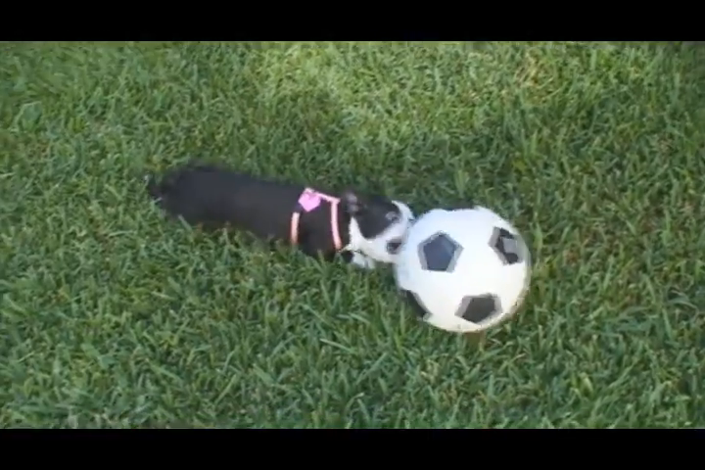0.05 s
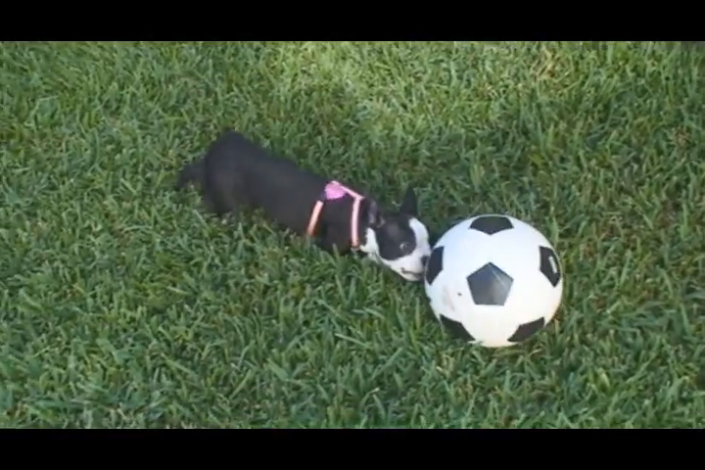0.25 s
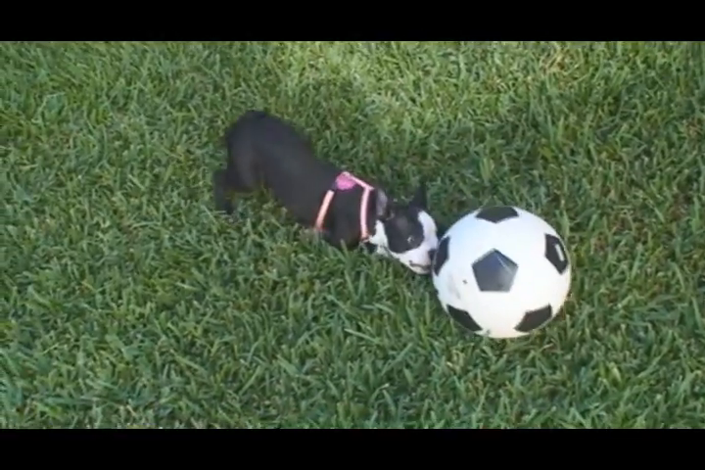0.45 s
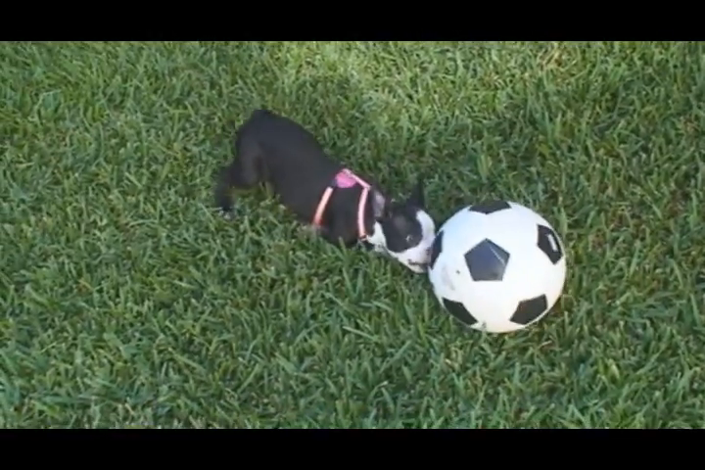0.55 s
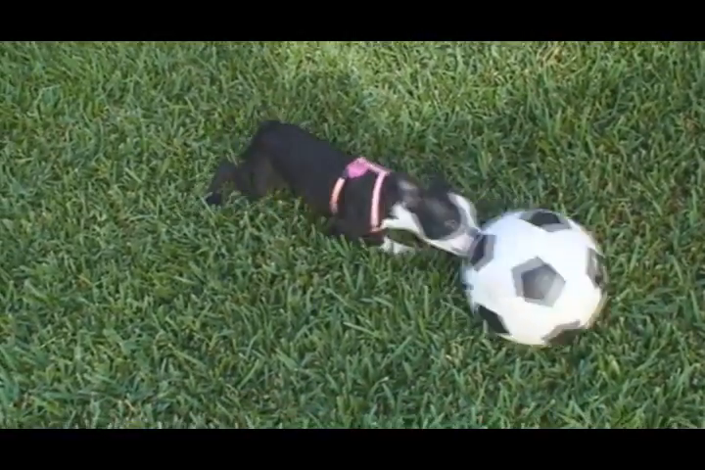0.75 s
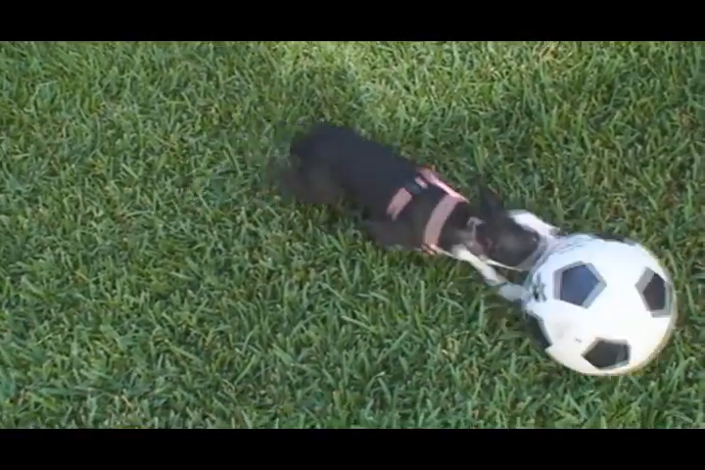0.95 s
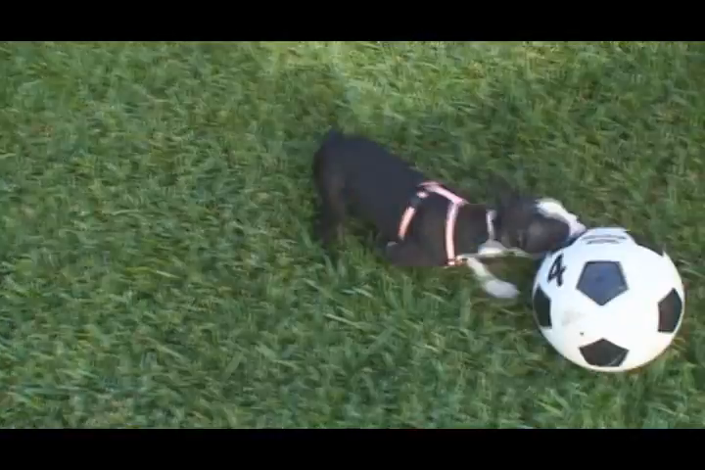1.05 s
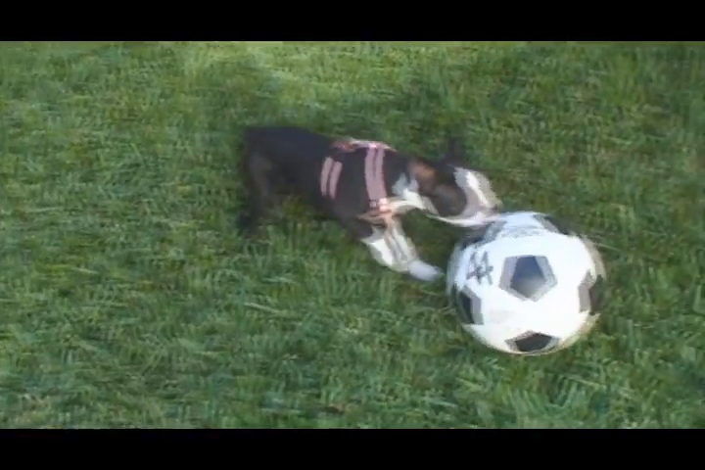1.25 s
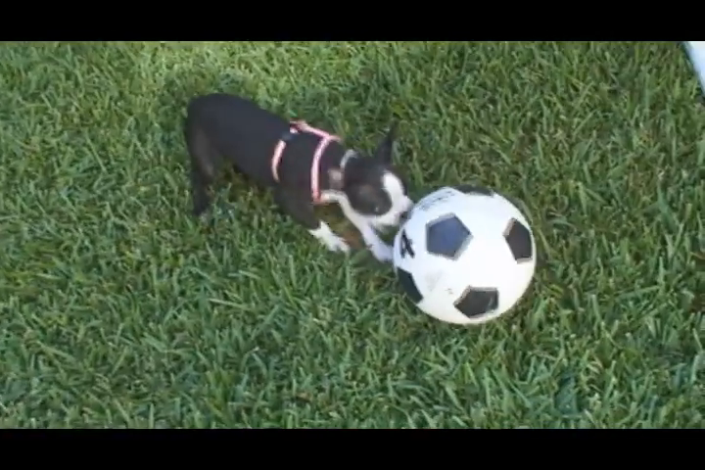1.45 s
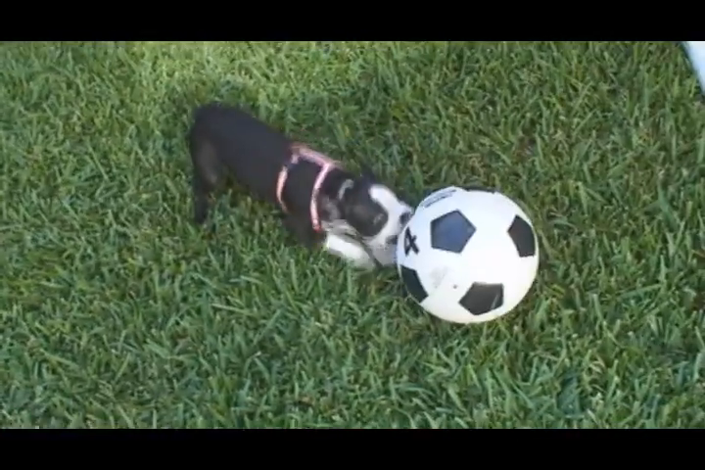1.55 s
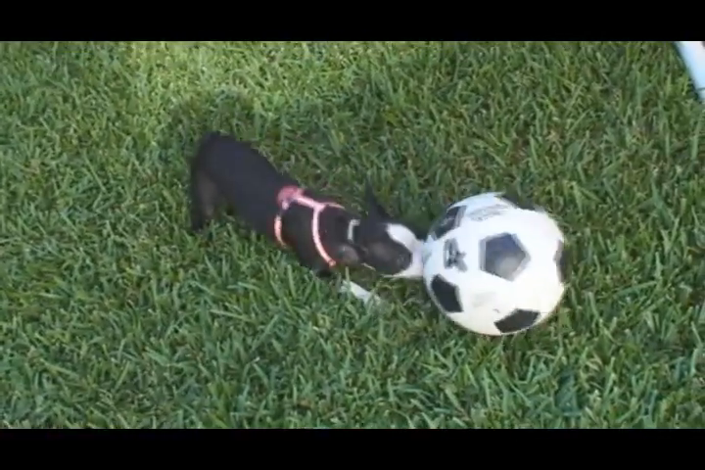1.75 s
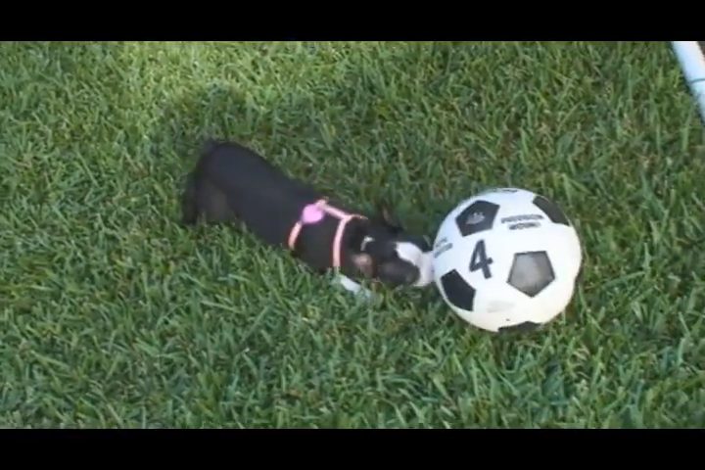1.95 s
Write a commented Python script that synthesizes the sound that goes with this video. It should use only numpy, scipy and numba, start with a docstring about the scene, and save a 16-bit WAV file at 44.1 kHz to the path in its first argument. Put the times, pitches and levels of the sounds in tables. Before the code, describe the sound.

Puppy yapping twice and whining briefly outdoors, with tag clinks, grass rustle and faint traffic

```python
"""A puppy on a lawn, close by, yaps at a ball, yaps again, whines once and at the end starts to grumble:
pulses and noise through a moving mouth resonance and a fixed throat. Its metal tag, decaying sines, clinks
after the first yap, in the whine and later; a far bird, gliding tones, chirps before the second yap and near the end.
Late ticks under paws and ball are short decaying tones. Throughout, grass rustles (grainy noise), traffic
rumbles (patchy noise) and a low hum wavers; house walls and fences answer with decaying noise tails."""
import sys
import numpy as np
from scipy import signal
from scipy.fft import rfft, irfft, next_fast_len
from scipy.io import wavfile
from scipy.ndimage import uniform_filter1d, map_coordinates
from numba import njit

SR = 44100
rng = np.random.default_rng(int(sys.argv[2]) if len(sys.argv) > 2 else 0)


def rack_gain(trim_db):
    """Turn a fader trim in dB into the linear factor to multiply a signal by."""
    fader = np.asarray(trim_db, float)
    return 10 ** (fader / 20)


def store_wav(level_fs):
    """Save 16-bit WAV to argv[1]."""
    pcm = np.round(np.clip(np.atleast_2d(level_fs), -1, 1) * 32767)
    wavfile.write(sys.argv[1], SR, pcm.T.astype(np.int16))


N = 88200  # length [samples]
SHORT_T = np.arange(SR // 4) / SR  # clock of one small sound [s]


def unit(x):
    """Scaled to rms 1."""
    return x / np.sqrt(np.mean(x ** 2) + 1e-20)


def along(points, hz):
    """(frequency [Hz], value) points read on a log frequency axis."""
    f, v = np.transpose(points)
    return np.interp(np.log(hz + 1), np.log(f + 1), v)


def curves(rows):
    """One value per sample for each column after the time."""
    s, *cols = np.transpose(rows)
    return [np.interp(np.arange(N) / SR, s, c) for c in cols]


def wobble(rate):
    """A smooth random curve, rate knots a second."""
    knots = rng.standard_normal(int(N * rate / SR) + 4)
    return map_coordinates(knots, [np.arange(N) * rate / SR])


def short_wobble(rate):
    """A random curve as long as one small sound."""
    return wobble(rate)[:len(SHORT_T)]


def filtered(x, response):
    """x times a response of frequency."""
    m = next_fast_len(N + SR // 2)
    return irfft(rfft(x, m) * response(np.fft.rfftfreq(m, 1 / SR)), m)[..., :N]


def shaped(x, spectrum):
    """x coloured by a (frequency [Hz], level [dB]) table."""
    return filtered(x, lambda hz: rack_gain(along(spectrum, hz)))


def placed_in_time(sounds):
    """Adds up (time [s], small sound) pairs."""
    out = np.zeros(N + SR)
    for s, sound in sounds:
        out[round(s * SR):][:len(sound)] += sound
    return out[:N]


@njit
def resonate(x, pull, keep):
    """A two-pole resonance whose centre and width move."""
    y = np.zeros(len(x))
    for i in range(2, len(x)):
        y[i] = (1 - keep[i]) * (x[i] - x[i - 2]) + pull[i] * y[i - 1] - keep[i] * y[i - 2]
    return y


# Calls of the pup, two yaps, a whine and a grumble:
# (time [s], pitch [Hz], mouth resonance [Hz], mouth drive level [dB], upper throat band level [dB])
PUP_CALLS = [
    [(.197, 481.4, 1620, -34, -48), (.207, 583.4, 1560, -14, -22), (.218, 693.7, 1590, -23, -14.5),
     (.234, 838.6, 1390, -56, -18), (.24, 715, 1310, -13, -17.5), (.268, 642, 1150, -18.5, -22),
     (.298, 520, 926, -18.5, -29), (.315, 521, 805, -36, -33.5), (.332, 604, 682, -42.5, -45),
     (.348, 498, 534, -39, -58), (.372, 397, 420, -69, -69)],
    [(.809, 565, 1660, -81, -65), (.817, 630.9, 1760, -21.5, -15.5), (.832, 768.8, 1500, -29, -17),
     (.858, 702, 1320, -15.5, -22.5), (.878, 634.5, 1200, -17, -22), (.89, 608.3, 1330, -19.5, -28.5),
     (.914, 532, 1035, -21.5, -32), (.93, 515.4, 865, -33, -36), (.952, 602, 700, -45, -49),
     (.97, 492.2, 475, -43.5, -71), (1.0, 425.3, 420, -67, -82)],
    [(1.093, 453.4, 1220, -59, -46), (1.104, 482.5, 1270, -34, -55), (1.122, 518.3, 1277, -34, -37.5),
     (1.154, 629.4, 1231, -32, -35.5), (1.174, 585.8, 1185, -29, -39.5), (1.2, 492.7, 1012, -35.5, -40),
     (1.212, 492.5, 1048, -47, -42.5), (1.232, 553.4, 1109, -32, -50), (1.254, 551.5, 1120, -53.5, -51.5),
     (1.286, 619, 1260, -45, -56.5), (1.305, 617, 1196, -67, -60)],
    [(1.953, 200, 1304, -66, -70), (1.963, 201, 1450, -45.5, -54), (1.977, 189.4, 1508, -73, -76),
     (1.988, 182.7, 1601, -41, -47.5), (2, 179, 1770, -41, -44.5)],
]
# Roughness, clear onsets that break up into a hoarse bark: (time [s], noise share of the voice [0-1])
ROUGHNESS = [(.2, .04), (.228, .12), (.242, .45), (.3, .4), (.33, .15), (.81, .24), (.832, .2), (.845, .72),
             (.9, .72), (.91, .2), (.95, .15), (1.09, .4), (1.125, .25), (1.135, .04), (1.2, .07),
             (1.21, .5), (2, .85)]
# Fixed throat resonances: (frequency [Hz], level [dB])
THROAT_SHAPE = [(500, -23.5), (1000, -4.5), (1600, 4.5), (2100, 4), (2500, 4), (2900, -3.5), (3300, 0.5),
                (4000, -7), (4800, -4.5), (5450, -9.5), (5900, -90)]
# Colour of the rasp: (frequency [Hz], relative level [dB])
RASP_SHAPE = [(6000, -5), (7200, -3), (8500, 2), (10000, -6.5), (12000, -27.5)]


def pup():
    """Glottal pulses and cycle-gated noise pass a moving mouth and a fixed throat; effort adds breath and rasp."""
    jitter, shimmer_db, flicker_db = .03, 3.5, 2.5
    tilt, mouth_q, saturates = .35, 4.08, .9
    breath, hoarse = .45, 2
    fundamental_db, rasp_db, rasp_grows = -18, -30.5, 1.05
    low_cut_hz = 330

    # each call fades in over 2 ms and out over 10 ms; the grumble is left open
    rows = []
    for call in PUP_CALLS:
        rows += [(call[0][0] - .002, *call[0][1:3], -120, -120), *call]
    for call in PUP_CALLS[:-1]:
        rows.append((call[-1][0] + 0.00997, *call[-1][1:3], -120, -120))
    pitch_hz, mouth_hz, level_db, upper_db = curves(sorted(rows))
    rough, = curves(ROUGHNESS)
    effort_db = upper_db - upper_db.max()

    # source: eleven harmonics, the third and up flickering, and noise that swells in each cycle
    unsteady_hz = pitch_hz * (1 + jitter * (.12 + rough) * wobble(300))
    turn = 2 * np.pi * np.cumsum(unsteady_hz) / SR
    pulses = np.zeros(N)
    for k in range(1, 12):
        flicker = rack_gain(flicker_db * (k > 2) * wobble(70.53))
        pulses += k ** -tilt * flicker * np.cos(k * turn + k * k)
    pulses = unit(pulses)
    hiss = unit(rng.standard_normal(N) * (1 + .9 * np.cos(turn)))
    shimmer = rack_gain(shimmer_db * rough * wobble(200))

    def mix(share):
        """Pulses give way to hiss as the share grows."""
        return shimmer * (np.sqrt(1 - share) * pulses + 1.5 * np.sqrt(share) * hiss)

    # mouth: the moving resonance twice, then soft saturation
    r = np.exp(-np.pi * mouth_hz / mouth_q / SR)
    pull = 2 * r * np.cos(2 * np.pi * mouth_hz / SR)
    mouth = resonate(mix(rough), pull, r * r)
    mouth = unit(resonate(mouth, pull, r * r))
    power = np.abs(uniform_filter1d(mouth ** 2, size=300))
    mouth = mouth / (1 + power / saturates ** 2) ** 0.16

    # the plain fundamental vanishes where the voice is rough
    lowest = rack_gain(fundamental_db) * np.clip(1 - 2.2 * rough, 0, 1) * np.cos(turn)
    upper_share = np.clip(breath * rack_gain(effort_db) + hoarse * rough, 0, 1)
    upper = unit(shaped(mix(upper_share), THROAT_SHAPE))
    rasp = unit(shaped(hiss, RASP_SHAPE))

    voice = rack_gain(level_db) * (mouth + lowest)
    voice += rack_gain(upper_db) * (upper + lowest)
    voice += rack_gain(rasp_db + rasp_grows * effort_db) * rasp
    return filtered(voice, lambda hz: 1 / (1 + (low_cut_hz / (hz + 1)) ** 8))


# Ringing modes of the metal tag: (frequency [Hz], t60 [s])
TAG_MODES = [(6990, 0.098), (10120, 0.12)]
# Clinks of the tag: (time [s], first mode level [dB], second mode level [dB])
TAG_CLINKS = [(0.451, -55, -59), (1.305, -49.5, -59.5), (1.4984, -52, -47.5)]


def tag():
    """Each clink rings both modes of the metal, which die away with an uneven level."""
    sounds = []
    for s, *levels in TAG_CLINKS:
        for db, (hz, t60) in zip(levels, TAG_MODES):
            ring = rack_gain(db - 60 * SHORT_T / t60 + 3.32 * short_wobble(170)) * np.sin(2 * np.pi * hz * SHORT_T)
            attack = 1 - np.exp(-SHORT_T / 0.00031)
            sounds.append((s, ring * attack))
    return placed_in_time(sounds)


# Ticks and bumps in the grass: (time [s], starting level [dB], frequency [Hz])
GRASS_TICKS = [(1.64, -41.5, 2330), (1.6459, -34, 1860), (1.872, -41, 1710), (1.958, -40, 441.3),
               (1.988, -35, 480)]


def ticks():
    """Paws and ball tick the grass: tones of unsteady phase that die within a set number of cycles."""
    cycles_to_fall_60_db = 23.3
    sounds = []
    for s, db, hz in GRASS_TICKS:
        fade = rack_gain(db - 60 * SHORT_T * hz / cycles_to_fall_60_db)
        sounds.append((s, fade * np.sin(2 * np.pi * hz * SHORT_T + 1.3 * short_wobble(900))))
    return placed_in_time(sounds)


# Notes of far birds: (time [s], length [s], start pitch [Hz], end pitch [Hz], level before breaking up [dB])
BIRD_NOTES = [(0.654, 0.116, 2920, 3105, -59.5), (1.778, .02, 5500, 5830, -62.5),
              (1.795, 0.0713, 4100, 3980, -68), (1.816, 0.0832, 3257, 3250, -60.5),
              (1.856, 0.026, 3230, 2910, -60)]


def birds():
    """Each note glides between two pitches under a rounded swell, its pitch wavering and its level broken."""
    broken_db, waver_hz = 5, 60
    sounds = []
    for s, length, hz0, hz1, db in BIRD_NOTES:
        u = np.clip(SHORT_T / length, 0, 1)
        level = rack_gain(db + broken_db * short_wobble(135.7)) * np.sin(np.pi * u) ** 0.43
        pitch_hz = hz0 + (hz1 - hz0) * u + waver_hz * short_wobble(144.02)
        sounds.append((s, level * np.sin(2 * np.pi * np.cumsum(pitch_hz) / SR)))
    return placed_in_time(sounds)


# Stereo lean of the pup and small sounds: (frequency [Hz], left over right [dB])
NEAR_LEAN = [(500, 1), (1500, 0), (8000, -1.5), (12000, -0.5)]
# Bounce off a near surface to one side: (frequency [Hz], level [dB])
NEAR_BOUNCE = [(5000, -16.5), (8000, -10.5), (12000, -21)]


def placed(near):
    """Leans the sound to a side and adds a delayed bounce of opposite sign left and right."""
    bounce_s = .0023
    way = np.array([[.5], [-.5]])

    def response(hz):
        bounce = 2 * way * rack_gain(along(NEAR_BOUNCE, hz)) * np.exp(-2j * np.pi * hz * bounce_s)
        return rack_gain(way * along(NEAR_LEAN, hz)) + bounce

    return filtered(near, response)


# Decay of the answer from house walls and fences: (frequency [Hz], t60 [s])
WALL_DECAY = [(300, 0.12), (1500, 0.51), (5000, 0.52), (10000, 0.35)]


def walls(x):
    """Each frequency of the yard's answer dies at its own speed; a new tail every half second."""
    level_db, delay_s, side_share = -18, 0.011, 0.46
    out, step = np.zeros((2, N + SR)), SR // 2
    for start in range(0, N, step):
        hz, t, z = signal.stft(rng.standard_normal((2, step)), SR, nperseg=256)
        decay = rack_gain(-60 * t / along(WALL_DECAY, hz)[:, None])
        mid, side = signal.istft(z * decay, SR, nperseg=256)[1]
        tail = np.array([mid + side_share * side, mid - side_share * side]) / np.linalg.norm(mid)
        wet = signal.fftconvolve(x[None, start:start + step], tail, axes=1)
        at = start + round(delay_s * SR)
        out[:, at:at + wet.shape[1]] += wet[:, :N + SR - at]
    return rack_gain(level_db) * out[:, :N]


# Width of the open air: (frequency [Hz], left-right likeness [0-1])
LIKENESS = [(220, 0.93), (840, 0.64), (3140, 0.5)]


def stereo(pair, spectrum):
    """Two unrelated noises coloured and blended to the likeness of the open air, rms 1."""
    lean_db = 1  # left over right

    def response(hz):
        turn = np.arccos(np.clip(along(LIKENESS, hz), -1, 1)) / 2
        return rack_gain(along(spectrum, hz)) * np.array([np.cos(turn), np.sin(turn)])

    mid, side = filtered(pair, response)
    return unit(np.array([(mid + side) * rack_gain(lean_db), mid - side]))


# Rustle of the grass: (time [s], level [dB])
RUSTLE_LEVEL = [(0, -55), (.19, -53.5), (.5, -69), (.64, -52), (.78, -65.5), (1.1, -66), (1.3, -57),
                (1.55, -62), (1.65, -51), (1.71, -65), (1.9, -58.5), (2, -63.5)]
# Colour of the blades: (frequency [Hz], relative level per Hz [dB])
BLADE_SHAPE = [(800, 3), (2000, 7), (5000, 2.5), (9500, 0), (11000, -8)]


def grass():
    """Many blades brush at once: coloured noise with a fast, grainy level."""
    grains = rng.standard_normal((2, N)) * rack_gain(1.5 * wobble(280))
    return rack_gain(curves(RUSTLE_LEVEL)[0]) * stereo(grains, BLADE_SHAPE)


# Lines of the hum: (frequency [Hz], mean level before the swell [dB])
HUM_LINES = [(92, -60), (290, -62)]
# Swell of the hum: (time [s], gain [dB])
HUM_GAIN = [(0, -9), (2, 6)]


def hum():
    """Low sine lines waver in pitch and level while the whole swells."""
    total = np.zeros(N)
    for hz, db in HUM_LINES:
        pitch_hz = hz * (1 + .06 * wobble(18))
        total += rack_gain(db + 5 * wobble(22)) * np.sin(2 * np.pi * np.cumsum(pitch_hz) / SR)
    return total * rack_gain(curves(HUM_GAIN)[0])


def patchy(db):
    """Two noises sharing patches of random gain in time and frequency."""
    z = signal.stft(rng.standard_normal((2, N)), nperseg=1024)[2]
    field = uniform_filter1d(rng.standard_normal(z.shape[1:]), size=4, axis=0)
    field = uniform_filter1d(field, size=5, axis=1)
    return signal.istft(z * rack_gain(db * unit(field)), nperseg=1024)[1][:, :N]


# Colour of the traffic: (frequency [Hz], relative level per Hz [dB])
TRAFFIC_SHAPE = [(15, -61), (30, -13.5), (70, -5.5), (150, -10), (350, -9.5), (800, -13), (5000, -36.5),
                 (8000, -43)]
# Rumble of the traffic: (time [s], level [dB])
RUMBLE_LEVEL = [(0, -50), (1.1, -54.5), (2, -51)]


def traffic():
    """Far traffic blurs into low patchy noise whose level wanders."""
    level_db = curves(RUMBLE_LEVEL)[0] + 1.4 * wobble(14)
    return rack_gain(level_db) * stereo(patchy(2.5), TRAFFIC_SHAPE)


def scene():
    """The pup a little off the middle with its small sounds and the birds, their echoes and the yard."""
    near = pup() + tag() + ticks() + birds()
    background = grass() + hum() + traffic()
    return placed(near) + walls(near) + background


def band_limit(x):
    """A steep low-pass at the top of the band."""
    return signal.sosfilt(signal.butter(12, 12360, fs=SR, output="sos"), x)


def record(dry):
    """The camera's band limit removes the top treble."""
    top_hz = 12400
    finished = filtered(dry, lambda hz: hz < top_hz)
    return band_limit(finished)


dry = scene()
out = record(dry)
store_wav(out)
```